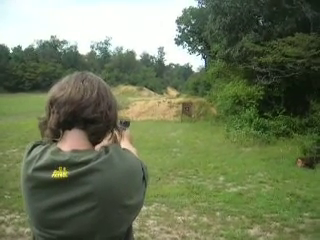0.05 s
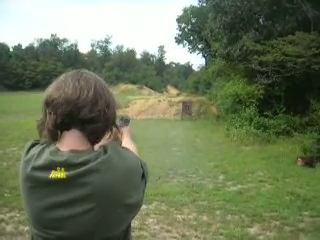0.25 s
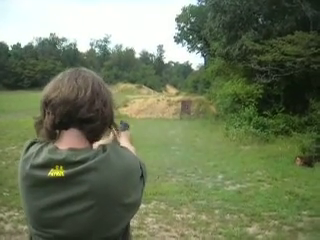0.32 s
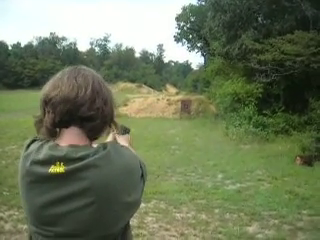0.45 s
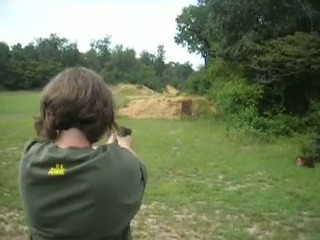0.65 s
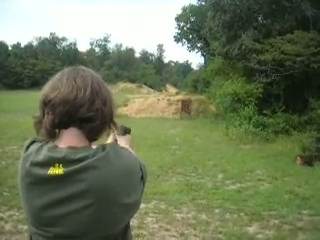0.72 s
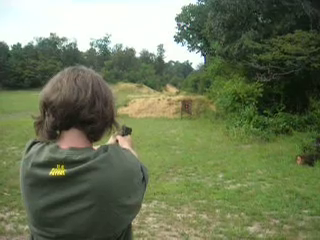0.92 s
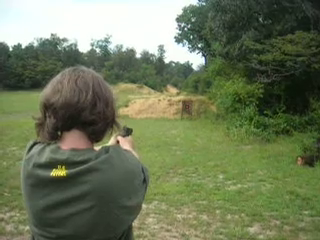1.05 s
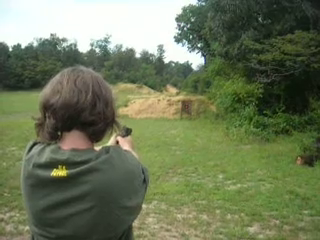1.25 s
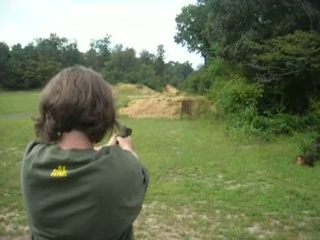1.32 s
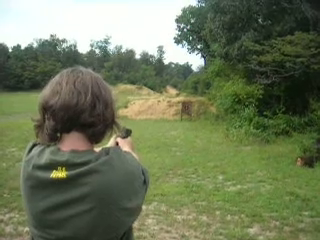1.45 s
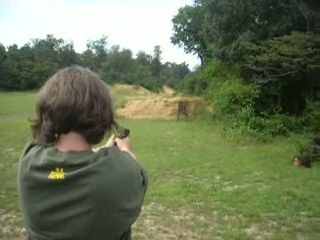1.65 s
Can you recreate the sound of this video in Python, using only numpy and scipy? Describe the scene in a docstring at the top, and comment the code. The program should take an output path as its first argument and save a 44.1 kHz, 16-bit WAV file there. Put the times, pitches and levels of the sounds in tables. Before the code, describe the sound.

A single pistol shot cracks on a grassy outdoor range after a moment of light wind. Heard from just behind the shooter, it briefly overloads the microphone, followed by sharp echoes, a faint metal ring and a long roll.

```python
"""Light wind bumps the microphone and a bird chirps faintly; then one pistol shot on a grassy outdoor range.
Heard from just behind the shooter, the muzzle blast overloads a small narrow-band microphone for about
10 ms. Ground, bushes and the earth bank throw back sharp echoes, metal rings briefly, foliage scatters
a hiss, and the distant tree line returns a long swelling roll."""
import sys
import numpy as np
from scipy import signal
from scipy.fft import rfft, irfft
from scipy.io import wavfile

SR = 44100
rng = np.random.default_rng(int(sys.argv[2]) if len(sys.argv) > 2 else 0)


def pcm_store(signal):
    """Save signal as 16-bit PCM."""
    levels = np.round(np.clip(np.atleast_2d(signal), -1, 1) * 32767)
    wavfile.write(sys.argv[1], SR, levels.astype(np.int16).T)


N = 74970
TIME = np.arange(N) / SR
SHOT_S = 0.2203
BANDWIDTH_HZ = 4850


def from_db(db):
    """Decibels to gain."""
    return 10 ** (np.asarray(db) / 20)


def unit_rms(x):
    """Scale to rms 1."""
    return x / np.sqrt(np.mean(x ** 2) + 1e-20)


def butter(x, hz, kind, order=2):
    """Causal Butterworth filter."""
    return signal.sosfilt(signal.butter(order, hz, kind, fs=SR, output="sos"), x + 1e-18)


def coloured(x, spectrum):
    """Shape x by (freq_hz, gain_db) points; rms 1."""
    hz, db = np.transpose(spectrum)
    bins_hz = np.maximum(np.arange(N // 2 + 1) * SR / N, 1)
    gain = from_db(np.interp(np.log(bins_hz), np.log(hz), db))
    in_band = (bins_hz > 20) & (bins_hz < BANDWIDTH_HZ)
    return unit_rms(irfft(rfft(x) * gain * in_band, N))


def scatter(spectrum, rate_per_s=5000, spread_db=3):
    """Dense small reflections of unequal size; rms 1."""
    arrivals = rng.random(N) < rate_per_s / SR
    sizes = from_db(spread_db * np.minimum(rng.exponential(1, N), 3))
    signs = rng.choice([-1, 1], N)
    return coloured(arrivals * sizes * signs, spectrum)


def burst(start_s, t60_s, hold_s=0):
    """Envelope: instant attack, hold, exponential release."""
    return (TIME >= start_s) * from_db(-60 * np.maximum(TIME - start_s - hold_s, 0) / t60_s)


def contour(points):
    """Envelope through (time_s, level_db) points, zero before the shot."""
    return (TIME >= SHOT_S) * from_db(np.interp(TIME, *np.transpose(points)))


def shock(start_s, overpressure_ms):
    """Blast wave: a pressure jump that falls through zero into suction."""
    age = np.maximum(TIME - start_s, 0) * 1000 / overpressure_ms
    return (TIME >= start_s) * (1 - age) * np.exp(-age)


def mode(x, pitch_hz, t60_s):
    """One decaying resonance; a unit click gives height 1."""
    radius = from_db(-60 / (t60_s * SR))
    angle = 2 * np.pi * pitch_hz / SR
    return signal.lfilter([0, np.sin(angle)], [1, -2 * radius * np.cos(angle), radius ** 2], x + 1e-18)


# outdoor hiss: freq_hz, gain_db
AIR_SPECTRUM = [(40, -4.5), (100, 0), (250, 3.5), (600, 1), (1200, -1), (1800, -5), (2600, 0.5), (3200, -4),
                (3750, 2), (4400, 3.5)]
# wind bumps: centre_s, level_db, sigma_s, pitch_hz
WIND_BUMPS = [(0.014, -43, .005, 128), (0.112, -38, .005, 100), (0.131, -46, .005, 163),
              (0.195, -30, .0032, 150), (0.897, -39, .005, 190), (0.914, -37, .005, 110),
              (0.930, -39, .004, 200), (0.948, -43, .005, 160)]


def wind():
    """Steady air hiss and low bumps on the microphone, each a swing or two of pressure."""
    out = from_db(-46) * coloured(rng.standard_normal(N), AIR_SPECTRUM)
    for centre_s, level_db, sigma_s, pitch_hz in WIND_BUMPS:
        t = TIME - centre_s
        envelope = np.exp(-0.5 * (t / sigma_s) ** 2)
        out += from_db(level_db) * envelope * np.sin(2 * np.pi * pitch_hz * t)
    return out


# falling chirps: start_s, length_s, start_hz, end_hz, level_db
BIRD_CHIRPS = [(0.048, 0.024, 2720, 2540, -51), (0.069, .03, 2700, 2420, -49)]


def bird():
    """Faint sine glides with rounded ends."""
    out = np.zeros(N)
    for start_s, length_s, start_hz, end_hz, level_db in BIRD_CHIRPS:
        progress = np.clip((TIME - start_s) / length_s, 0, 1)
        pitch_hz = start_hz + (end_hz - start_hz) * progress
        tone = np.sin(2 * np.pi * np.cumsum(pitch_hz) / SR)
        out += from_db(level_db) * np.sin(np.pi * progress) * tone
    return out


# fronts, direct and off shooter and ground: start_s, relative_db, overpressure_ms
SHOCK_FRONTS = [(0.2203, 4, 0.15), (0.2214, 11.5, 0.15), (0.2230, 4, 0.12), (0.2240, 10.5, 0.62),
                (0.2257, 10, 0.49), (0.2267, 17.5, .5), (0.2283, 6, 0.58), (0.2298, 3.5, 0.99)]
# resonances under the blast: pitch_hz, gain_db, t60_s
BLAST_RESONANCES = [(550, -7.5, 0.022), (960, -11, 0.022), (1280, -14.5, 0.015), (2034, -14, 0.019),
                    (2795, -10.5, 0.015)]
# muzzle gas: freq_hz, gain_db
GAS_SPECTRUM = [(40, -11), (170, -6), (330, -3), (530, 5), (730, -3), (950, 2), (1300, -1), (1700, -6),
                (2700, -8), (4000, -7)]


def muzzle_blast():
    """Shock fronts and the resonances they excite, a roar of turbulent gas, a slow push of air behind."""
    fronts = sum(from_db(db) * shock(start_s, ms) for start_s, db, ms in SHOCK_FRONTS)
    jumps = np.diff(fronts, prepend=0)
    body = sum(from_db(db) * mode(jumps, hz, t60_s) for hz, db, t60_s in BLAST_RESONANCES)
    crack = butter(fronts + body, 110, "high", order=1)
    turbulence = coloured(rng.standard_normal(N), GAS_SPECTRUM)
    gas = turbulence * burst(start_s=0.2229, t60_s=0.025, hold_s=0.0057)
    thump = butter(shock(start_s=0.2245, overpressure_ms=1.2), [129, 230], "band")
    return from_db(-5) * crack + from_db(-2.5) * gas + from_db(-2) * thump


# nearby scatter: freq_hz, gain_db
GROUND_SPECTRUM = [(60, -29), (150, -15.5), (300, 0), (600, 3.5), (1000, 2.5), (1400, -4.5), (2100, -5),
                   (3000, -2.5), (3900, -9.5)]


def ground_scatter():
    """Ground and bushes close by return a short spray of reflections."""
    reflections = scatter(GROUND_SPECTRUM, rate_per_s=1700, spread_db=2)
    return from_db(-16) * burst(SHOT_S, t60_s=0.11, hold_s=0.042) * reflections


# foliage envelope: time_s, level_db
FOLIAGE_LEVELS = [(0.22, -68), (0.24, -28.5), (0.33, -25), (0.41, -27.5), (0.49, -33.5), (0.55, -30),
                  (0.65, -34), (0.75, -33.5), (0.87, -31.5), (1.0, -32), (1.15, -37), (1.29, -37.5),
                  (1.45, -46), (1.7, -53.5)]
# foliage colour: freq_hz, gain_db
FOLIAGE_SPECTRUM = [(100, -26.5), (250, -12), (550, -3.5), (1100, -0.5), (1500, -2.5), (2100, -3),
                    (2700, 3), (3300, 0.5), (3900, -6), (4400, 1)]


def foliage_hiss():
    """Leaves scatter the shot into a fading hiss."""
    return contour(FOLIAGE_LEVELS) * scatter(FOLIAGE_SPECTRUM)


# reflectors: start_s, peak_db, low_hz, high_hz, spray_db, spray_t60_s
REFLECTORS = [(0.248, -15, 405, 1520, -35, 0.022), (0.2550, -5, 600, 3000, -22, 0.026),
              (0.2600, -12, 446, 1500, -20.5, 0.044), (0.2674, -8, 584, 3210, -20, 0.038),
              (0.2735, -8, 450, 1200, -47, .07), (0.3229, -3.5, 610, 3140, -24, 0.032),
              (0.328, -16.5, 450, 1100, -21, 0.046), (0.3392, -5, 1350, 3200, -24, .03),
              (0.3580, -21, 400, 900, -24.5, 0.071), (0.4065, -21.5, 500, 900, -30, 0.05),
              (0.4325, -23.5, 500, 1200, -38, .03), (0.4615, -15, 538, 946, -23, .025),
              (0.4644, -19.5, 488, 730, -44, 0.014), (0.5215, -26, 2000, 3360, -43, .15),
              (0.531, -28.5, 330, 1500, -32.5, .22), (1.0822, -14, 640, 1290, -37.5, 0.015),
              (1.1615, -16.5, 850, 1140, -25, .025), (1.236, -23, 700, 1270, -33, 0.023),
              (1.350, -23, 669, 1210, -29, 0.034), (1.4026, -18.5, 617, 1014, -29, 0.029),
              (1.6535, -35, 598, 1000, -28.5, .04)]


def echoes():
    """Each reflector returns one band of the blast and a short spray of scatter."""
    out = np.zeros(N)
    for start_s, peak_db, low_hz, high_hz, spray_db, spray_t60_s in REFLECTORS:
        pulse = butter(shock(start_s, overpressure_ms=0.29), [low_hz, high_hz], "band")
        spray = unit_rms(butter(rng.standard_normal(N), [low_hz, high_hz], "band"))
        out += from_db(peak_db) * pulse / np.abs(pulse).max()
        out += from_db(spray_db) * spray * burst(start_s, spray_t60_s)
    return butter(out, 250, "high")


# strikes: start_s, level_db
METAL_STRIKES = [(0.293, -30), (0.314, -30.5), (0.362, -26.5), (0.385, -34.5)]
# clear modes: pitch_hz, relative_db, t60_s
METAL_MODES = [(2630, -6.5, .5), (2685, -5, .35), (2752, -3, 0.46), (2800, -6, .3), (2932, -3, .45),
               (3210, -7.5, .35)]


def metal_ring():
    """Struck metal, probably slide and spent case: clear modes inside a cluster of denser ones."""
    cluster = unit_rms(butter(rng.standard_normal(N), [2570, 2950], "band"))
    power = sum((from_db(db) * burst(start_s, t60_s=0.24)) ** 2 for start_s, db in METAL_STRIKES)
    out = cluster * np.sqrt(power)
    starts_s, strike_db = np.transpose(METAL_STRIKES)
    for pitch_hz, relative_db, t60_s in METAL_MODES:
        signs = rng.choice([-1, 1], len(starts_s))
        clicks = np.zeros(N)
        clicks[(starts_s * SR).astype(int)] = from_db(strike_db) * signs
        out += from_db(relative_db - 3.5) * mode(clicks, pitch_hz, t60_s)
    return out


# roll envelope: time_s, level_db
ROLL_LEVELS = [(0.22, -67), (0.5, -39.5), (0.74, -41), (0.81, -31), (0.88, -30), (1.0, -30), (1.12, -28),
               (1.3, -29.5), (1.42, -29), (1.48, -33.5), (1.58, -34.5), (1.7, -38.5)]
# roll colour: freq_hz, gain_db
ROLL_SPECTRUM = [(100, -36.5), (220, -17.5), (400, -15), (520, -5), (680, -1.5), (1000, -0.5), (1200, -9),
                 (1500, -15.5), (2200, -16), (3000, -18), (3900, -36)]


def tree_line_roll():
    """Reflections from the far trees merge into a long swell."""
    return contour(ROLL_LEVELS) * scatter(ROLL_SPECTRUM)


def scene():
    """Mono sum at the microphone."""
    shot = muzzle_blast() + echoes() + metal_ring()
    landscape = ground_scatter() + foliage_hiss() + tree_line_roll()
    return (wind() + bird() + shot + landscape)[None]


def record(dry):
    """The microphone saturates; the recorder cuts bass and treble, clips peaks and adds a DC offset."""
    limit, dc_offset = 0.74, -0.023  # full scale 1
    mic = butter(dry, 3804, "low", order=6)
    saturated = limit * np.tanh(mic / limit)
    bass_cut = butter(saturated, 55.5, "high", order=1)
    band_filter = signal.cheby2(14, 80, BANDWIDTH_HZ, fs=SR, output="sos")
    clipped = np.clip(signal.sosfilt(band_filter, bass_cut), -limit, limit)
    output_filter = signal.cheby2(12, 70, 17000, fs=SR, output="sos")
    return signal.sosfilt(output_filter, clipped) + dc_offset


dry = scene()
out = record(dry)
pcm_store(out)
```